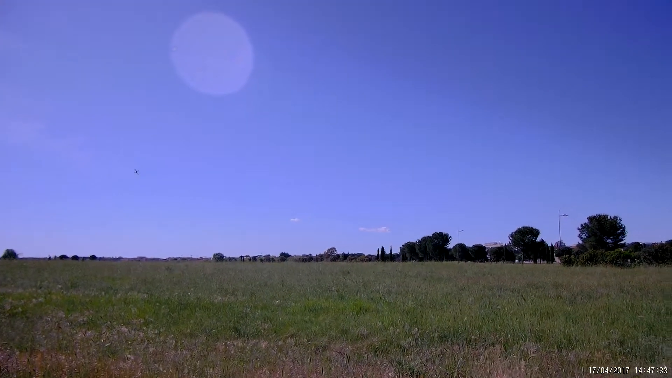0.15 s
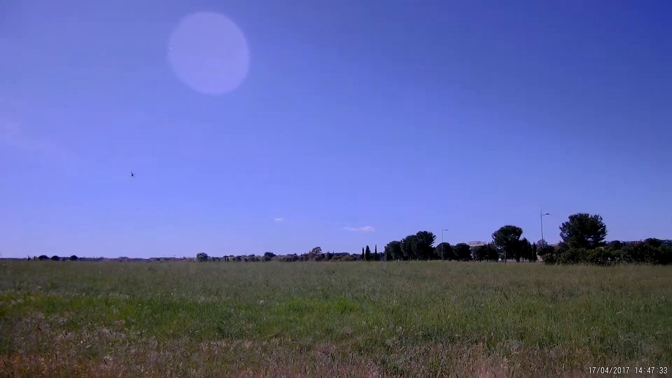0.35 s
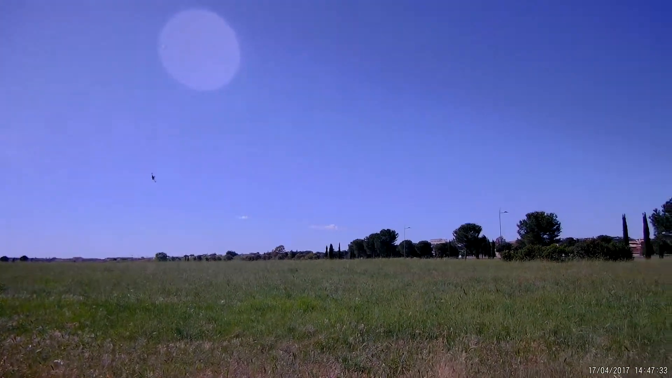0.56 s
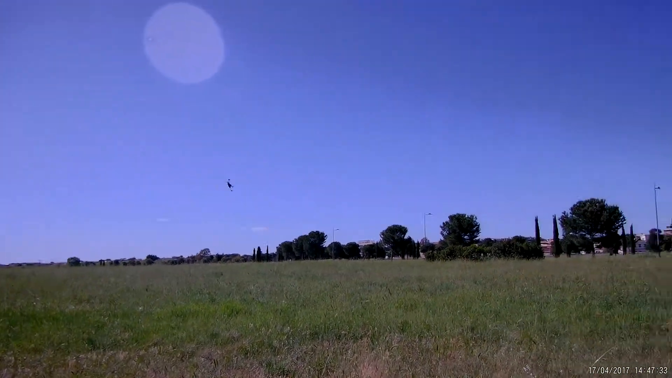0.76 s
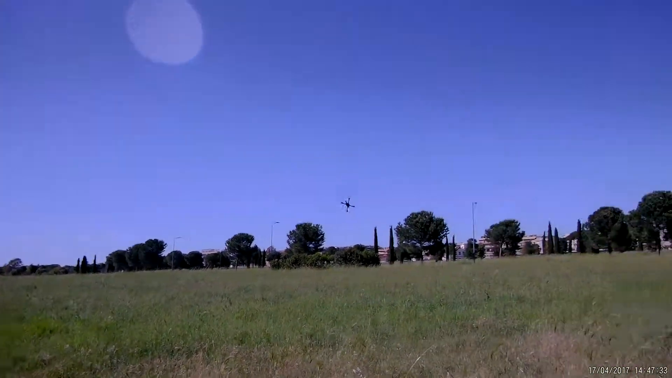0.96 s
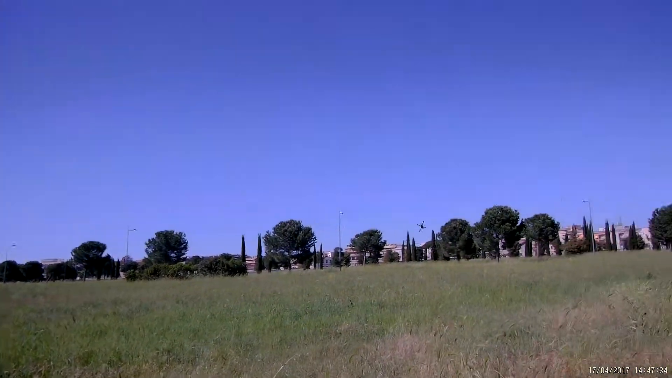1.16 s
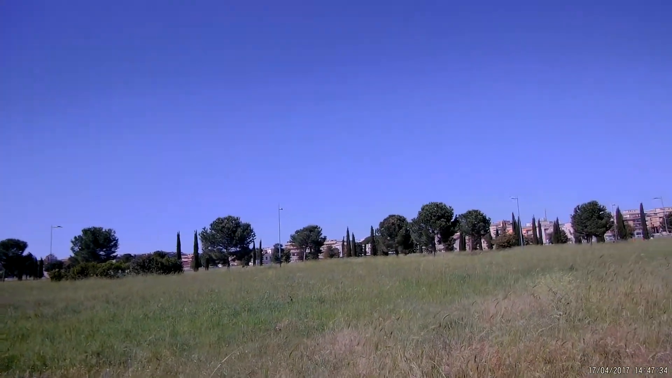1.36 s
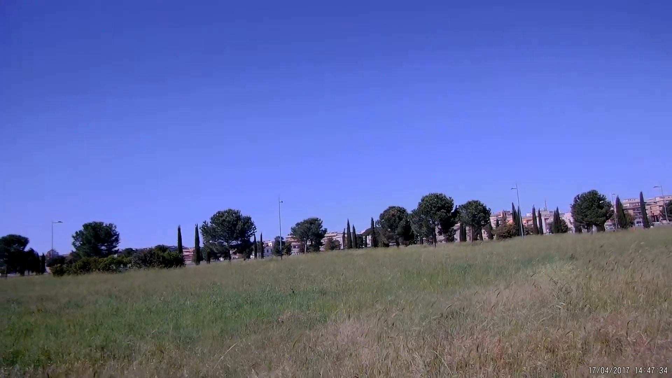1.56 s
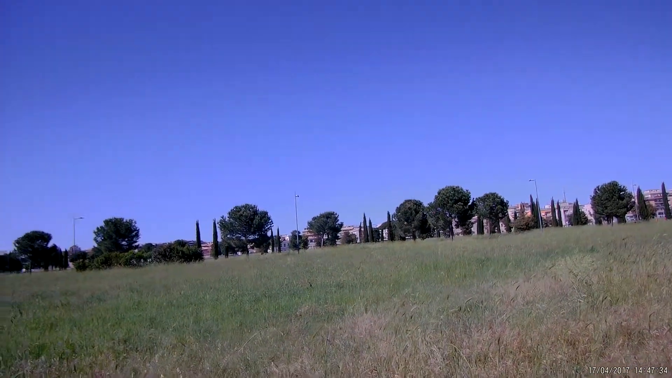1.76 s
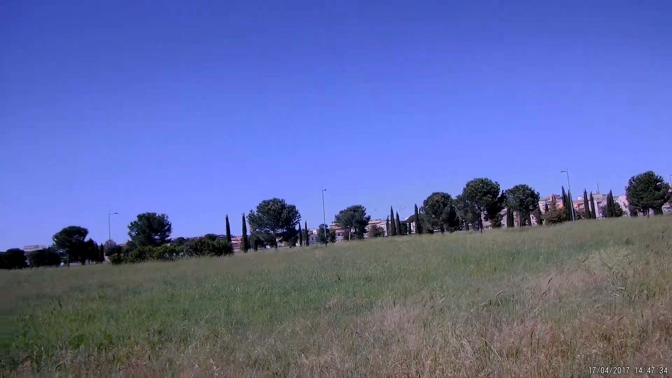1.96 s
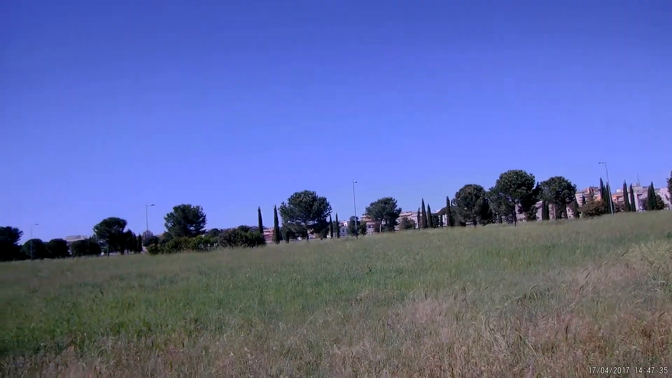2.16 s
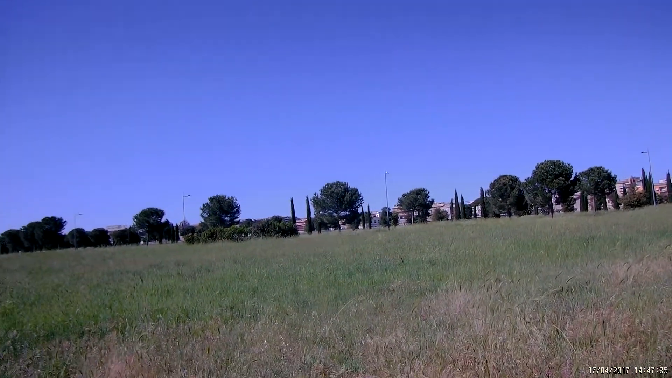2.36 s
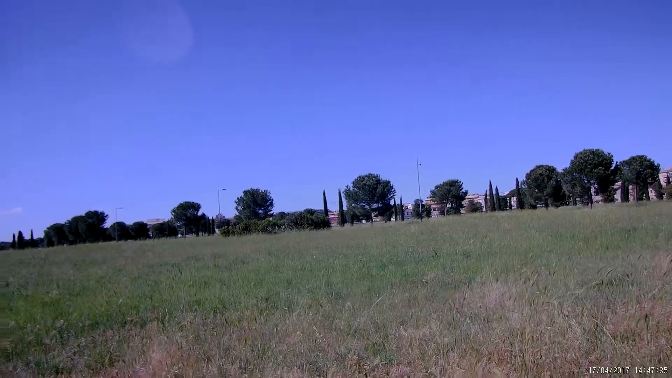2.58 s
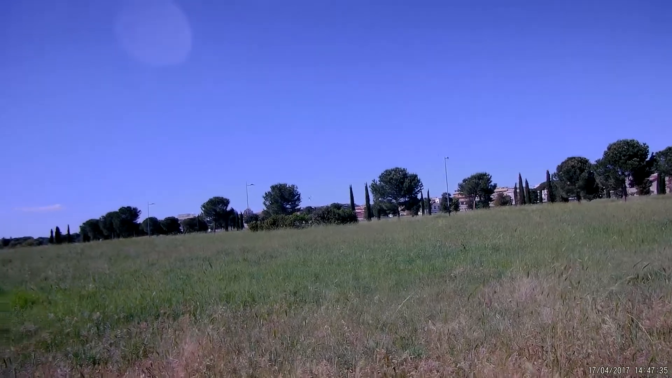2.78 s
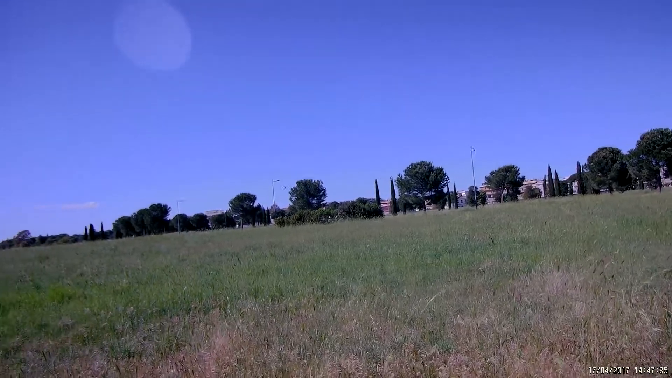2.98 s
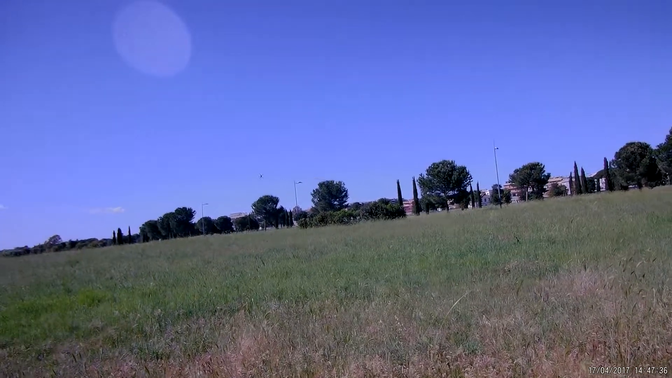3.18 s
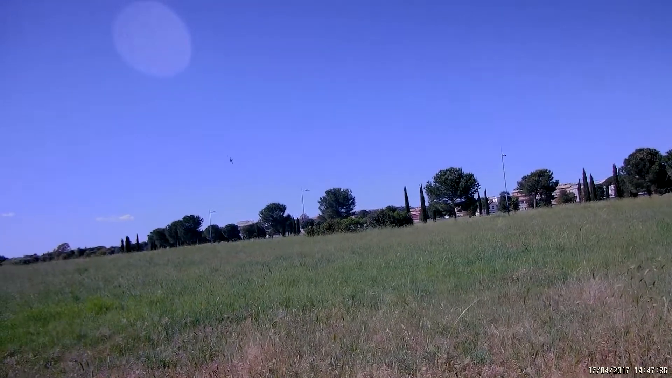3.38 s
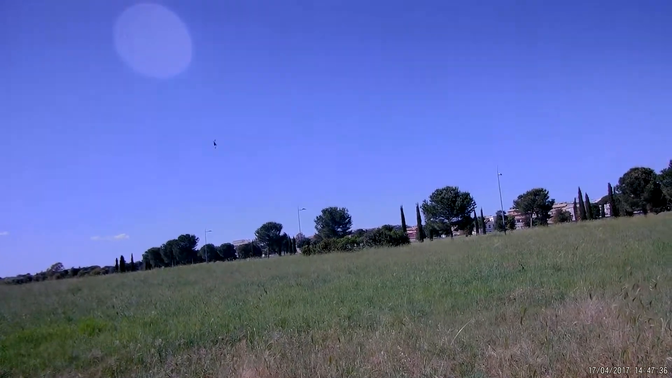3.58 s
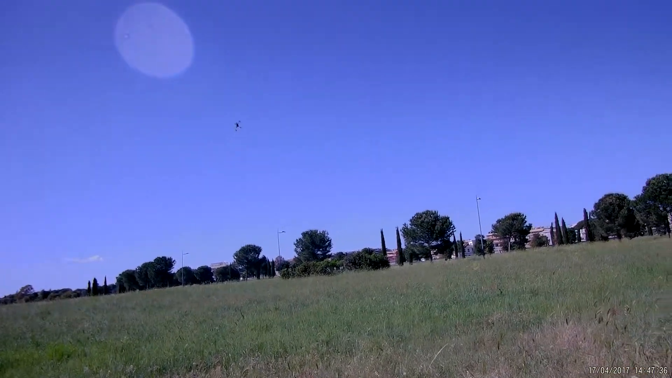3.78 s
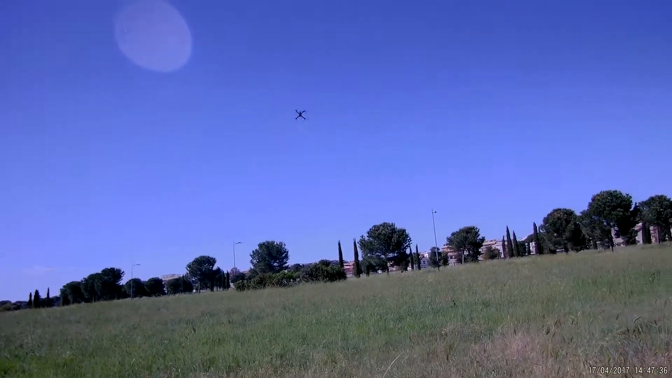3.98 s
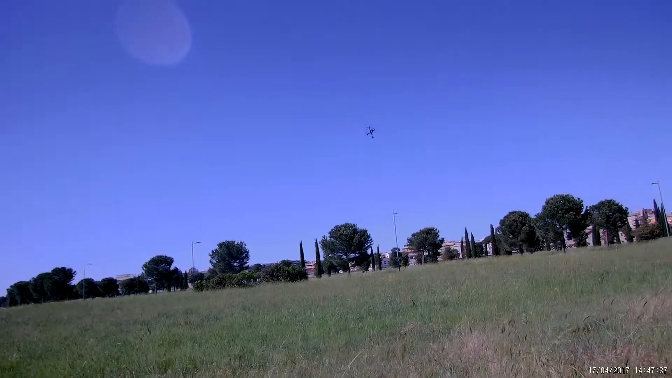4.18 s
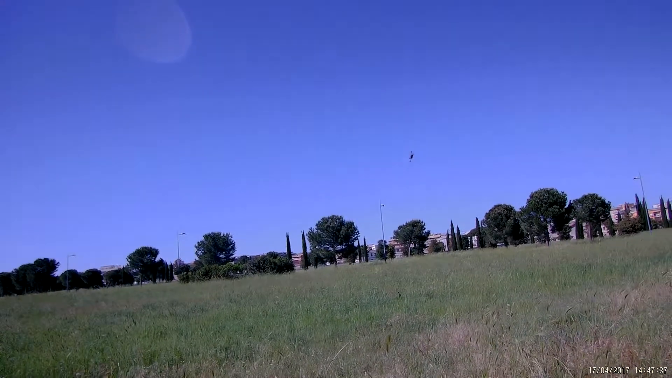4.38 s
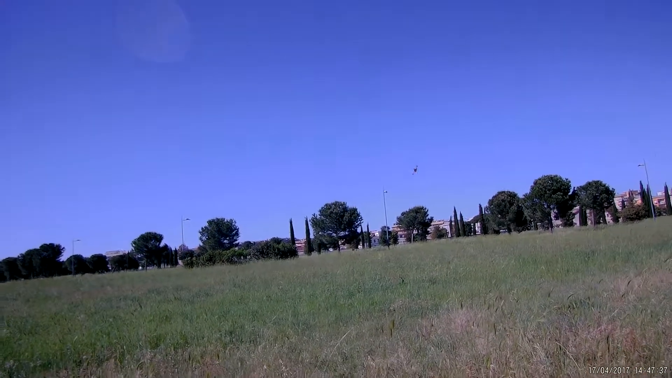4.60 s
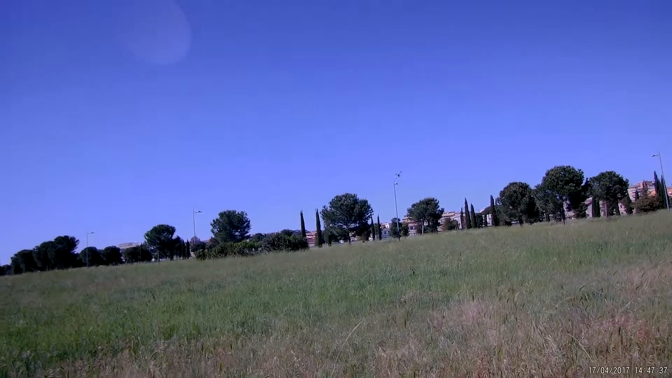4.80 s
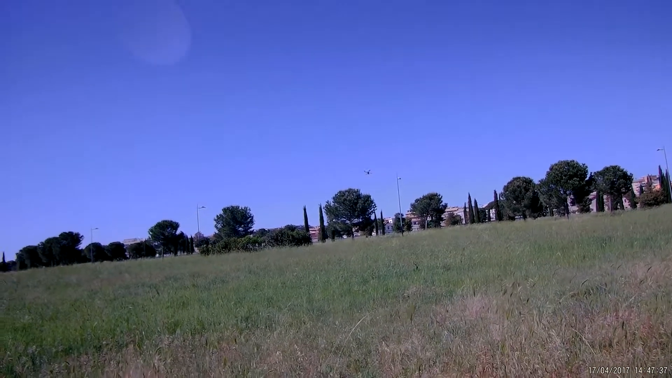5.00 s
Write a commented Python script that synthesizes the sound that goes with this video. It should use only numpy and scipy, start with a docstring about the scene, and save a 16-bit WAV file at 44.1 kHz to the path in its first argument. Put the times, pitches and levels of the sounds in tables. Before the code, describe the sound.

In an open field, a small quadcopter approaches faintly, then bursts past at about one second with a loud throbbing buzz, high whine and airy rush. Its pitch sags as it recedes with a rough rasp. After a near lull around three and a half seconds it passes again, softer and lower, then fades. Mono, outdoors, no echo, faint wind rumble.

```python
"""Quadcopter racing past in an open field

A small quadcopter races twice past the listener, in mono. Its four propellers are stacks of sines at
slightly different pitches that beat against each other as the throttle moves; random side bands roughen
the lines. The blades chop shaped noise into a rush and a hiss.
Slowly wavering low noise makes a faint wind rumble underneath."""
import sys
import numpy as np
from scipy.fft import rfft, irfft, next_fast_len
from scipy.io import wavfile
from scipy.ndimage import uniform_filter1d, map_coordinates

SR = 44100
rng = np.random.default_rng(int(sys.argv[2]) if len(sys.argv) > 2 else 0)


def wav_out(sig):
    """Save sig, one row per channel (or a flat mono array), as 16-bit PCM at SR to the path in sys.argv[1]."""
    wavfile.write(sys.argv[1], SR, np.round(np.clip(np.atleast_2d(sig).T, -1, 1) * 32767).astype(np.int16))


N = 222352

# level of the four blade-pass tones together: (t/s, level/dB)
TONE_LEVEL = [(0.0, -54.5), (0.3, -52), (0.41, -44), (0.55, -42.5), (1.01, -23.5), (1.06, -25), (1.11, -32),
              (1.3, -44.5), (1.41, -50), (1.51, -53.5), (1.56, -44), (1.63, -47.5), (1.96, -42),
              (2.25, -42.0), (2.69, -47.5), (2.84, -45.5), (3.27, -47.5), (3.51, -60.5), (3.68, -42.0),
              (3.96, -34.5), (4.07, -35.5), (4.43, -49.5), (4.48, -62), (4.53, -54.5), (4.63, -61.5),
              (5.04, -57)]
# level of the rush of air through the rotors: (t/s, level/dB)
RUSH_LEVEL = [(0.0, -69.5), (.3, -66), (0.68, -55.5), (0.94, -46), (1.15, -50.5), (1.25, -45.5),
              (1.32, -50.0), (1.38, -47.5), (1.52, -55), (1.69, -55.5), (1.74, -52.5), (2.05, -54),
              (2.2, -52), (2.28, -55.5), (2.64, -54.5), (2.89, -56.5), (3.01, -60.5), (3.11, -58),
              (3.58, -67), (3.66, -57.5), (3.75, -49.5), (3.92, -45), (4.13, -43.5), (4.3, -49.5),
              (4.42, -55), (4.52, -59.5), (4.74, -59), (4.96, -57), (5.04, -59.5)]
# how far the tail and the wash face the listener: (t/s, 1 = tail on, 0 = side on, below 0 = nose on)
TAIL_TO_LISTENER = [(0, -0.33), (.3, -0.41), (.5, 0.32), (.8, 0.16), (1.2, 0.47), (1.55, 0.42),
                    (1.85, 0.77), (2.35, 1), (2.7, 0.9), (3.3, 0.55), (3.65, -0.067), (4.1, 0.021),
                    (4.3, 0.23), (4.5, 0.06), (4.85, 0.33), (5.04, 0.078)]
# how the rotors stand out in the overtones: (t/s, fastest rotor/dB, slow pair/dB)
ROTOR_LEAD = [(0, -5, -6), (.3, -11, 4), (.5, 10, 20), (.75, -5, -14), (1.05, 10, 4.5), (1.4, 7.5, -7.5),
              (1.8, 8, -11), (2.2, 18.5, 10.5), (2.6, 14.5, -16), (3.2, 18.5, 7), (3.7, -1.5, 0),
              (4.1, -4.5, -4.5), (4.35, 14, 23), (4.6, 12, 3), (4.75, 10, 1), (4.88, -5, -4), (5.04, 2, 9)]
# how far turbulence smears the lines: (t/s, roughness per harmonic number)
LINE_SMEAR = [(0, .14), (.55, .17), (.8, .18), (1.03, .15), (1.2, .23), (1.5, .19), (1.85, .25), (2.1, .16),
              (2.4, .15), (2.7, .24), (3.3, .22), (3.65, .13), (4.2, .15), (4.4, .09), (5.04, .1)]
# how well the overtones carry: (f/Hz, level/dB)
OVERTONE_CARRY = [(1500, 2.5), (1690, 0.5), (1800, 1.5), (1900, -2.5), (1960, 1.5), (2050, 6.5),
                  (2300, 5.5), (2600, 5.5), (2780, -2), (2950, -5), (3200, -3.5), (3700, -2.5), (4300, 2.5),
                  (4700, -1), (5200, -13), (7500, 11), (9000, -29)]


def amp(db):
    """Decibels to gain."""
    return 10 ** (np.asarray(db) / 20)


def unit(x):
    """Scale to rms 1."""
    return x / np.sqrt(np.mean(x ** 2) + 1e-20)


def curves(rows):
    """One value per sample for each column after the time."""
    s, *columns = np.transpose(rows)
    t = np.arange(N) / SR
    return np.array([np.interp(t, s, column) for column in columns])


def swells(rows):
    """Gain of bell-shaped swells given as (t/s, level/dB, half length/s)."""
    t = np.arange(N) / SR
    return amp(sum(db * np.exp(-((t - s) / length) ** 2) for s, db, length in rows))


def wobble(rate, count=4):
    """Smooth random curves, one per rotor by default, with rate knots a second."""
    position = [np.arange(N) * rate / SR]
    knots = int(N * rate / SR) + 4
    return np.array([map_coordinates(rng.standard_normal(knots), position) for _ in range(count)])


def filtered(x, response):
    """x times a response of frequency."""
    size = next_fast_len(N + 8192)
    hz = np.fft.rfftfreq(size, 1 / SR)
    return irfft(rfft(x, size) * response(hz), size)[..., :N]


def coloured(x, spectrum):
    """x shaped by (f/Hz, level/dB) points on a log axis, at rms 1."""
    f, db = np.transpose(spectrum)
    return unit(filtered(x, lambda hz: amp(np.interp(np.log(hz + 1), np.log(f), db))))


def blade_phase(drift=0.004503, wake_drift=0.00252, jitter=0.004964):
    """Each rotor's blade angle; the flight controller nudges every motor, harder as the tail turns to us."""
    # blade-pass pitch of the rotors, fastest first: (t/s, f/Hz, f/Hz, f/Hz, f/Hz)
    blade_pitch = [(0, 633, 620, 597, 555.4), (.3, 631, 619.3, 603.5, 562), (.45, 701.3, 668.4, 646, 603),
                   (.58, 705.7, 683.7, 655, 617), (.68, 735.4, 704.7, 672.7, 643),
                   (.75, 738.7, 707, 673, 639.7), (.87, 741.3, 694.2, 668, 622),
                   (.95, 706, 692.6, 664, 604.5), (1.03, 680.8, 676, 640, 574),
                   (1.12, 677, 663, 626.7, 531.7), (1.17, 672, 639, 591.3, 520),
                   (1.23, 651, 607, 585, 483.6), (1.3, 636.6, 602.5, 554.6, 496),
                   (1.39, 631.7, 584.8, 560.7, 426), (1.48, 627, 587.4, 556, 428.4),
                   (1.55, 607.6, 557.4, 546.8, 424), (1.64, 590, 539.7, 536, 417),
                   (1.72, 599, 545, 514.6, 435), (1.8, 605.3, 558.4, 527.2, 429.5),
                   (1.88, 594.4, 558.8, 522.4, 444.6), (2.08, 590.8, 559.7, 488.6, 443.4),
                   (2.33, 602.5, 565.6, 504.7, 462.9), (2.66, 648.4, 608.3, 550.3, 513),
                   (2.86, 656.7, 616.7, 575, 517.3), (3.2, 567.4, 561.4, 512.6, 455.9),
                   (3.5, 574.2, 557.5, 513.8, 431), (3.66, 623.8, 567.6, 504.4, 438.4),
                   (3.75, 614, 561, 479.5, 431.4), (3.82, 649.5, 554.3, 484, 423.7),
                   (3.89, 629.7, 549.6, 481.7, 413.3), (3.94, 613, 539.5, 450.2, 444.2),
                   (4.08, 593, 560.1, 454, 448.5), (4.19, 572, 554.5, 456, 455.3),
                   (4.27, 527.8, 515.5, 429.2, 422.5), (4.36, 531, 517.5, 427.2, 420),
                   (4.41, 522, 519.2, 426, 423), (4.52, 535.5, 528, 420.6, 412.5),
                   (4.62, 535, 519.5, 419.4, 412), (4.71, 509, 484, 416.5, 408),
                   (4.87, 519.6, 451.8, 401.6, 394.5), (5.04, 497.3, 402.4, 399, 392.8)]
    spool_s = 0.033  # the motors smooth the throttle over this time
    slow_nudges = (drift + wake_drift * curves(TAIL_TO_LISTENER)) * wobble(28)
    nudges = slow_nudges + jitter * wobble(140)
    hz = uniform_filter1d(curves(blade_pitch), int(spool_s * SR), axis=1) * (1 + nudges)
    start_turns = rng.random((len(hz), 1))
    return 2 * np.pi * (np.cumsum(hz, axis=1) / SR + start_turns)


def rotor_tones(fade_db=2.0, fade_rate=7):
    """The tone's level, divided among the rotors by the bank of the craft; each fades in and out a little."""
    # each rotor against the second: (t/s, fastest rotor/dB, third/dB, slowest/dB)
    bank_balance = [(0, -9, -5, -6.5), (.28, -12, -2.5, -8), (.5, 8, -6.5, -0.5), (.7, 1.5, -1.5, -5.5),
                    (.84, -5, -1.5, -8), (1.06, -18.5, -13, -21), (1.18, -2.5, 0, -7), (1.3, -8, -12, -2),
                    (1.46, -2, -5, -11.5), (1.6, -5.5, -2.5, -19), (1.78, -8.5, -3, -6.5),
                    (2.05, -16, -10.5, -13), (2.85, -5, -4, -5.5), (3.35, -10.5, -7, -8.5),
                    (3.62, 3, -8.5, -11.5), (4, 4, -3, -5), (4.18, 3, -18.5, -8.5), (4.36, -10, -18.5, -39),
                    (4.65, -10, -7.5, -18), (5.04, -4, -4, -12)]
    fastest, third, slowest = amp(curves(bank_balance))
    part = np.array([fastest, np.ones(N), third, slowest]) * amp(fade_db * wobble(fade_rate))
    return amp(curves(TONE_LEVEL)) * part / np.linalg.norm(part, axis=0)


def shares(tone, loudness_power, lead_db=0, slow_db=0):
    """Each rotor's part in a layer; a higher power favours the rotors with the louder tones."""
    part = tone ** loudness_power
    part[0] *= amp(lead_db)
    part[2:] *= amp(slow_db)
    return part / np.linalg.norm(part, axis=0)


def partials(phase, weight, orders, rough, eddy_rate=110, spread=0):
    """Multiples of the blade pass of all rotors; eddies cut by the blades give each line a rough skirt."""
    def eddies():
        return rough * wobble(eddy_rate)

    def line(angle):
        return (1 + eddies()) * np.sin(angle) + eddies() * np.cos(angle)

    total = 0
    for k, db in orders:
        angle = k * phase + spread * k * k  # spread staggers the overtones and blunts the pulse
        total = total + amp(db) * (weight * line(angle)).sum(0)
    return total


def blade_tones(phase, tone):
    """The blade-pass fundamentals, whose close pitches beat into a throbbing buzz."""
    return np.sqrt(2) * partials(phase, tone, [(1, 0)], rough=.1, eddy_rate=80)


def churn(phase, tone, churn_db=-8):
    """Blades cutting disturbed air add a very rough copy of the tone, 2 % lower, that follows the rush."""
    rough_tone = partials(phase, shares(tone, loudness_power=0.47), [(0.98, 0)], rough=2.9, eddy_rate=63)
    return amp(curves(RUSH_LEVEL)[0] + churn_db) * unit(rough_tone)


def once_a_turn(phase, tone, shaft_smear=1.9, low_hz=330):
    """Unequal blades sound once a turn, between the blade tones; the lowest lines are faint, cut steeply below
    330 Hz."""
    # the lines: (multiple of the blade pass, level/dB)
    unbalance_lines = [(.5, -25.5), (1.5, -20.5), (2.5, -28.5), (3.5, -37)]
    # how unequal each rotor's blades are, fastest first: (level/dB)
    blade_mismatch = [-6.5, -1.5, 4, 6.5]
    # level of the lines over the blade tone: (t/s, level/dB)
    shaft_level = [(0, 5.5), (.45, 0.5), (.58, -6), (.7, -14), (.8, -4), (1.0, -4.5), (1.15, -0.5),
                   (1.3, 4), (1.5, -13), (2.2, -1), (2.75, -1), (3.3, -5), (4.1, 3), (4.35, -4),
                   (5.04, -11)]
    unequal = np.sqrt(2) * tone * amp(blade_mismatch)[:, None] * amp(curves(shaft_level))
    smear = shaft_smear * curves(LINE_SMEAR)[0]
    lines = sum(partials(phase, unequal, [(k, db)], rough=smear * k, eddy_rate=70)
                for k, db in unbalance_lines)
    return filtered(lines, lambda hz: hz ** 5 / np.hypot(hz ** 5, low_hz ** 5))


def harmonic(phase, share, order):
    """One harmonic of all rotors at rms 1; the higher it is, the more the turbulence smears it."""
    rough = curves(LINE_SMEAR)[0] * order
    lines = partials(phase, share, [(order, 0)], rough=rough)
    return unit(lines / np.hypot(1, rough))  # the roughness adds no loudness


def octave_whine(phase, tone):
    """The second harmonic, a whine an octave above the blade tones."""
    # level of the whine: (t/s, level/dB)
    whine_level = [(0.0, -63), (0.45, -55.5), (0.58, -53.5), (0.701, -47.5), (0.92, -33.5), (1.04, -31.5),
                   (1.15, -45), (1.249, -38.5), (1.31, -46), (1.41, -41.5), (1.61, -57), (2.23, -49),
                   (2.45, -56.5), (3.17, -52.5), (3.56, -63.5), (3.66, -49.5), (3.799, -38.5),
                   (3.94, -41.5), (4.05, -34.5), (4.15, -32), (4.44, -58), (4.62, -61), (4.73, -60.5),
                   (4.85, -60), (5.04, -58.5)]
    lead_db, slow_db = curves(ROTOR_LEAD)
    share = shares(tone, loudness_power=1.0, lead_db=lead_db, slow_db=slow_db)
    return amp(curves(whine_level)[0]) * harmonic(phase, share, order=2)


def upper_whine(phase, tone):
    """Third to sixth harmonics, coloured by how well the overtones carry."""
    # level of the third harmonic, which carries the others along: (t/s, level/dB)
    upper_level = [(0.0, -69.5), (0.43, -64.5), (0.64, -71), (0.77, -48), (0.89, -43), (1.31, -53.5),
                   (1.44, -44), (1.541, -54.5), (1.85, -52.5), (2.28, -49), (2.47, -51.5), (2.56, -59),
                   (2.99, -65), (3.44, -63), (3.55, -78), (3.66, -53.5), (3.75, -49), (4.13, -44),
                   (4.41, -56.5), (4.49, -54), (4.62, -64.5), (4.79, -60.5), (4.88, -63.5), (5.04, -71)]
    # make-up, harmonics over the third: (t/s, fourth/dB, fifth and sixth/dB, fastest rotor/dB, slow pair/dB)
    overtone_mix = [(0, -8, -10, -7, -1), (.5, 2, -15, -14, -5), (.8, 1, -13, -1.5, -9),
                    (1.0, -4.5, -19, 9, 0), (1.13, -2, -3.5, 4, 1), (1.45, -8.5, -17, 3, 1),
                    (1.85, 2, -11, 12, -0.5), (2.3, -6, -7, 6.5, -8), (2.7, -1, -9, 16, -6),
                    (3.2, -9, -3, 13, 9), (3.65, -2, -11, -8, -2), (3.95, -1.5, -11, -9.5, -7),
                    (4.15, 0, -11, -2, 1), (4.35, -13, -7, 6, 13), (4.5, -7, -18, 13, -1),
                    (4.75, 1, -8, 5, -15), (5.04, 3, -3, 11, -3)]
    fourth_db, edge_db, lead_db, slow_db = curves(overtone_mix)
    share = shares(tone, loudness_power=0.83, lead_db=lead_db, slow_db=slow_db)
    third = coloured(harmonic(phase, share, order=3), OVERTONE_CARRY)
    fourth = amp(fourth_db) * coloured(harmonic(phase, share, order=4), OVERTONE_CARRY)
    fifth_and_sixth = harmonic(phase, share, order=5) + harmonic(phase, share, order=6)
    edge = amp(edge_db) * coloured(fifth_and_sixth, OVERTONE_CARRY)
    return amp(curves(upper_level)[0]) * (third + fourth + edge)


def blade_rasp(phase, tone):
    """The highest blade overtones, blunted and very rough, strongest from behind."""
    # the overtones before colouring: (multiple of the blade pass, level/dB)
    rasp_lines = [(4, -5), (5, 1), (6, 1), (7, 2), (8, 3), (9, 4)]
    # level of the rasp over the rush: (t/s, level/dB)
    rasp_level = [(0, -20), (.5, -13), (.8, -9), (1.4, -3), (1.98, -2.5), (2.1, 0.5), (2.22, 3), (2.4, 6),
                  (2.52, 2.5), (2.75, 4), (2.9, -1), (3.3, -4.5), (3.65, -17), (4.0, -6.5), (4.28, -4),
                  (4.5, -7), (5.04, -8)]
    share = shares(tone, loudness_power=0.61, lead_db=curves(ROTOR_LEAD)[0])
    lines = partials(phase, share, rasp_lines, rough=1.7, eddy_rate=170, spread=0.402)
    return amp(curves(RUSH_LEVEL)[0] + curves(rasp_level)[0]) * coloured(lines, OVERTONE_CARRY)


def propellers(phase, tone):
    """Four harmonic stacks: tones, rough copy, once-a-turn lines, whines and rasp."""
    low = blade_tones(phase, tone) + churn(phase, tone) + once_a_turn(phase, tone)
    return low + octave_whine(phase, tone) + upper_whine(phase, tone) + blade_rasp(phase, tone)


def chopped(phase, share, depth):
    """Noise that swells each time a blade sweeps towards the listener."""
    return np.exp(depth * (share * np.cos(phase)).sum(0)) * rng.standard_normal(N)


def air(phase, tone, wash_growth=0.89, fizz_db=3, fizz_tail_db=-8, gust_db=1.0, flutter_db=1.17):
    """Propeller wash, tip hiss and fizz, all pulsing with the blades; the fizz drops when tail on."""
    # turbulent wash of the propellers: (f/Hz, level/dB)
    wash_colour = [(120, -27), (280, -28.5), (450, -0.5), (700, 4), (1000, 7), (1500, 3), (2400, 2),
                   (3200, -9), (3700, -18.5), (4300, 0), (5200, -5), (7500, -19.5), (10000, -12)]
    # tip hiss: (f/Hz, level/dB)
    hiss_colour = [(1500, -29), (3600, -8.5), (4300, -6), (5200, -4.5), (6400, 2), (7800, 4), (8700, -6),
                   (9800, -8), (11500, -74)]
    # fizz above the hiss: (f/Hz, level/dB)
    fizz_colour = [(8500, -59), (10000, -9), (11300, 2), (12300, -0.5), (13500, -15), (14700, -0.5),
                   (15800, -4)]
    # how much of the wash is blown towards the listener: (t/s, level over the rush/dB)
    downwash_level = [(0, -3.5), (.5, 6), (.7, -2.5), (.95, -1.5), (1.2, 3), (1.42, 1), (1.75, 4.5),
                      (2.3, 4.5), (2.7, 4), (3.3, 2), (3.75, 1.5), (4.1, 1), (4.35, 0.5), (5.04, -1)]
    # brief spits in the whole rush of air: (t/s, swell/dB, half length/s)
    air_spits = [(1.222, 7.5, 0.0072), (1.75, -0.5, 0.023), (2.19, 3, 0.017), (2.597, 4, 0.0065)]
    share = shares(tone, loudness_power=0.31)
    gusts = amp(gust_db * wobble(110, count=1)[0])
    flutter = amp(flutter_db * wobble(22.13, count=1)[0])
    rush_db, tail = curves(RUSH_LEVEL)[0], curves(TAIL_TO_LISTENER)[0]
    swell_db = rush_db - rush_db.mean()
    wash_gain = amp(wash_growth * swell_db + curves(downwash_level)[0])
    wash = wash_gain * coloured(chopped(phase, share, depth=0.11), wash_colour)
    hiss = amp(swell_db) * coloured(chopped(phase, share, depth=0.44), hiss_colour)
    fizz_gain = amp(fizz_db + swell_db + fizz_tail_db * tail)
    fizz = fizz_gain * coloured(chopped(phase, share, depth=0.089), fizz_colour)
    return amp(rush_db.mean()) * (wash + (hiss + fizz) * flutter) * gusts * swells(air_spits)


def breeze(level_db=-68.0, gust_db=1.0, gust_rate=9):
    """A faint low rumble of shaped noise that comes and goes."""
    # the breeze and the quiet of the field: (f/Hz, level/dB)
    breeze_colour = [(15, -2.5), (28, 3), (64, 0.5), (130, -7.5), (220, -7), (350, -5.5), (700, -24)]
    # puffs of wind on the microphone: (t/s, level over the breeze/dB, half length/s)
    wind_puffs = [(1.3, 2, 0.054), (1.47, 7, 0.025), (2.15, 6, 0.046), (2.34, 3, 0.054), (3.43, 5.5, 0.029)]
    gusts = amp(level_db + gust_db * wobble(gust_rate, count=1)[0]) * swells(wind_puffs)
    return gusts * coloured(rng.standard_normal(N), breeze_colour)


def scene():
    """The quadcopter over the breeze, alike in both channels."""
    phase, tone = blade_phase(), rotor_tones()
    mono = propellers(phase, tone) + air(phase, tone) + breeze()
    return np.array([mono, mono])


def record(dry, top_hz=15830):
    """Cut everything from the band limit upwards."""
    return filtered(dry, lambda hz: hz < top_hz)


dry = scene()
out = record(dry)
wav_out(out)
```